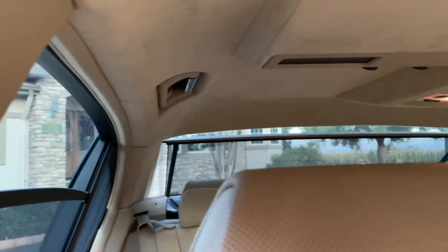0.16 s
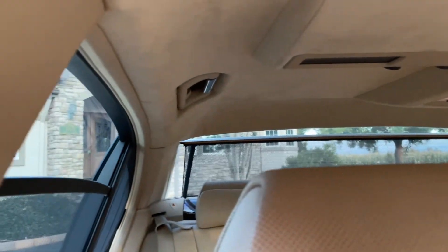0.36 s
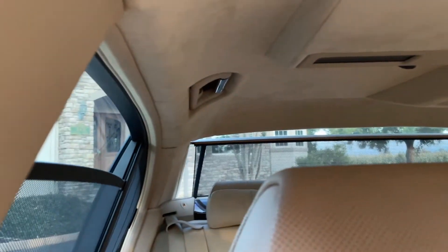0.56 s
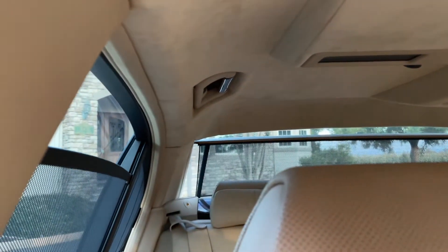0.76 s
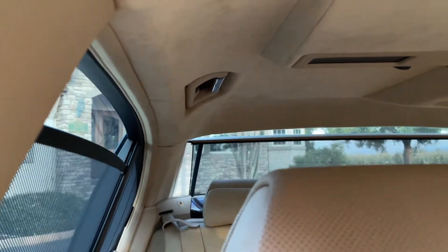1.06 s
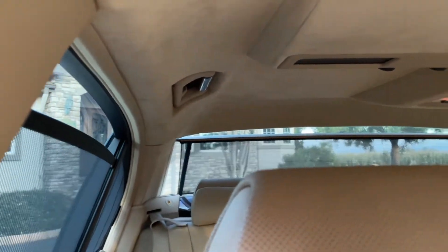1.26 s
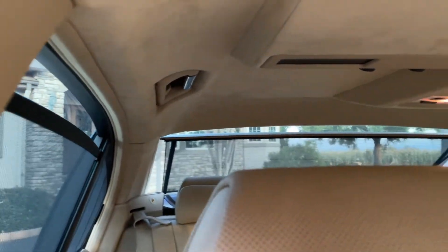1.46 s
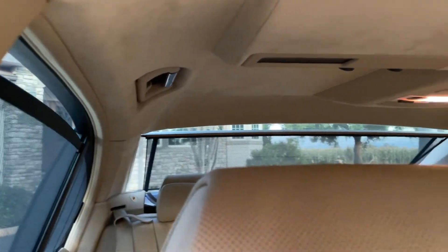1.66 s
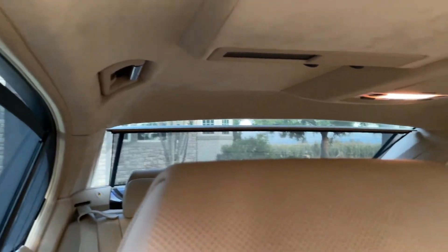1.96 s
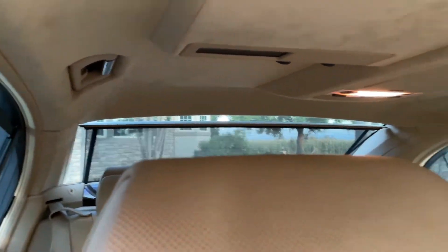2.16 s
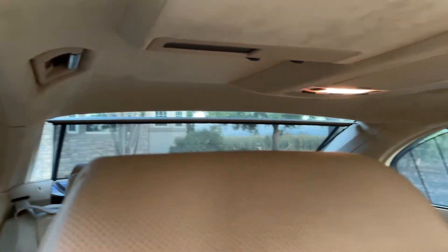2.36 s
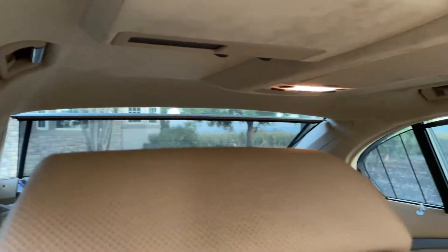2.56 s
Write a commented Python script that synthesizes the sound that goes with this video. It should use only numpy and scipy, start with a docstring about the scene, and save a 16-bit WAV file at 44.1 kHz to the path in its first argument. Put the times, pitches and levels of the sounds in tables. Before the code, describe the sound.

Two thin electric blind motors whir inside an idling car and stop with double knocks and a click

```python
"""Motor-driven sun blinds in a parked car

A twelve-cylinder engine idles as a harmonic series of its working cycle; a pump under the cabin hums on as
wavering sines. Two small motors draw mesh blinds along their rails: their gliding whines beat, over noise
from gears and mesh. Each blind knocks at its end stop, as decaying noise through door panel resonances;
a switch clicks off, among short coloured noise ticks. Two close microphone ports hear the treble with a lag.
"""
import sys
import numpy as np
from scipy import signal
from scipy.fft import rfft, irfft, next_fast_len
from scipy.io import wavfile
from scipy.ndimage import uniform_filter1d, map_coordinates

SR = 44100
rng = np.random.default_rng(int(sys.argv[2]) if len(sys.argv) > 2 else 0)


def boost_factor(decibels):
    """Convert a level in decibels to a linear amplitude factor."""
    exponent = np.asarray(decibels, float) / 20
    return 10 ** exponent


def wav_out(sig):
    """Save sig, one row per channel (or a flat mono array), as 16-bit PCM at SR to the path in sys.argv[1]."""
    wavfile.write(sys.argv[1], SR, np.round(np.clip(np.atleast_2d(sig).T, -1, 1) * 32767).astype(np.int16))


N = 119070  # samples

# Cabin noise spectrum, shape only: f/Hz, density/dB per Hz
CABIN_COLOUR = [(15, -20.5), (35, -3.5), (100, -6.5), (170, -8.5), (270, -10), (420, -16.5), (600, -27),
                (850, -31.5), (1250, -27), (1600, -35.5), (2150, -35.5), (3500, -45), (6000, -53),
                (10000, -62), (15800, -66.5), (16100, -90.5)]
# Left-right correlation of the cabin noise: f/Hz, correlation
CABIN_ALIKE = [(60, 1), (250, 0.76), (700, .1), (1300, 0.52), (4000, 0.12), (15000, 0.42)]
# Steady hums of pumps and fans: f/Hz, rms level/dB, scale of the frequency waver/Hz
HUMS = [(66.8, -41, 1), (105, -44, 1), (301, -56, 3), (1236, -67, 6), (1269, -61.5, 5), (1825, -79, 6),
        (2100, -75, 6), (12000, -94, 12)]
# Rate of the engine's working cycle: t/s, f/Hz
CYCLE_RATE = [(0.0, 6.045), (0.45, 6.058), (0.9, 6.011), (1.35, 6.048), (1.8, 6.071), (2.25, 5.977),
              (2.7, 5.977)]
# Fraction of a cycle completed at t = 0
CYCLE_START = .0267
# Engine orders: multiple of the cycle rate, rms level before the idle drift/dB, left-right difference/dB
ENGINE_ORDERS = [(6, -53, 0), (8, -51, -2), (9, -44, -4), (10, -51, 0), (12, -21, 1), (13, -43, 1),
                 (14, -37, 0), (15, -32, 1), (16, -48, 0), (18, -43, 1), (20, -42, -2), (21, -43, -3),
                 (22, -44, -2), (23, -46, 7), (24, -30, 5), (25, -50, 5), (26, -40, 3), (27, -51, 0),
                 (28, -59, -1), (33, -52, 2), (34, -53, -2), (36, -64, 0), (45, -60, 2)]
# Lead of the uneven orders above each firing multiple: {firing multiple: lead/cycle}
UNEVEN_LEAD = {12: .08, 24: .19}
# Phase shift common to the uneven orders/rad
UNEVEN_SHIFT = .25
# Slow drift of the whole engine: t/s, level/dB
IDLE_DRIFT = [(0, 0), (1.8, .2), (2.7, -.8)]
# Plastic clicks: t/s, onset level/dB, t60/s, brightness/dB per octave
CLICKS = [(1.8435, -48, .04, -8), (1.8595, -44, .05, -7), (1.8906, -50, .03, -7), (2.0158, -48, .05, -4),
          (2.0764, -30, .025, -1), (2.078, -37, .055, -2), (2.09, -45, .04, -2), (2.1725, -52, .035, -2)]
# Click spectrum before the brightness tilt, shape only: f/Hz, density/dB per Hz
PLASTIC_COLOUR = [(500, -12.5), (1300, -2), (1650, -10), (2050, -0.5), (2700, -3.5), (3250, -2.5),
                  (4000, -6.5), (5200, -5.5), (6200, -13.5), (9000, 0.5), (13500, -11.5), (16000, -6),
                  (16500, -38.5)]
# Left-right correlation of the clicks
CLICKS_ALIKE = .95
# Blinds striking their stops: t/s, peak level/dB, t60 of the exciting noise/s, left-right difference/dB
KNOCKS = [(1.8386, -28.5, .06, -1), (1.8585, -32, .05, 5.5), (1.8909, -39, 0.035, 0.5),
          (2.017, -39, 0.043, 2.5), (2.0282, -39, 0.11, -1.5), (2.078, -28.5, .05, -2.5),
          (2.0885, -32, .04, -2.5), (2.1713, -40, .12, 0)]
# Door panel resonances: f/Hz, bandwidth/Hz, relative level/dB
PANEL_MODES = [(214, 49, -6), (330, 70, 4), (445, 110, 2.5), (650, 150, -8), (850, 290, -12),
               (1260, 440, -19)]
# Whines of the two blind motors: t/s, f/Hz, level/dB
MOTOR_A = [(0, 535, -53), (1.25, 537, -53), (1.36, 532, -53), (1.64, 548, -52), (1.84, 548, -50),
           (2.0, 548, -56), (2.06, 545, -80)]
MOTOR_B = [(0, 547, -54), (.3, 547, -54), (.42, 541, -54), (.55, 546, -54), (.93, 544, -54),
           (1.05, 550, -54), (1.2, 545, -54), (1.36, 541, -56), (1.64, 560, -53), (1.8, 560, -54),
           (1.86, 552, -80)]
# Scale of the random waver of each whine/Hz
MOTOR_WAVER_HZ = 1.8
# Gear rumble: t/s, level/dB
GEAR_LEVEL = [(0, -57), (1.0, -57), (1.8, -57), (2.0, -57), (2.12, -60), (2.24, -80), (2.7, -85)]
# Gear rumble spectrum, shape only: f/Hz, density/dB per Hz
GEAR_COLOUR = [(140, -30), (220, 0), (330, 1), (450, 0), (700, -7), (1100, -15), (2500, -22), (5000, -40)]
# Mesh sliding in its rails: t/s, level/dB
SLIDE_LEVEL = [(0, -58), (.6, -58.5), (1.3, -58.5), (1.5, -58), (1.8, -58.5), (1.9, -60.5), (1.975, -61.5),
               (1.995, -90), (2.7, -90)]
# Sliding spectrum, shape only: f/Hz, density/dB per Hz
SLIDE_COLOUR = [(300, -20), (700, -5.5), (1100, -3), (2000, -6), (4000, -7.5), (5600, -13), (6800, -9),
                (8500, -13), (11000, -17), (14500, -17), (15800, -18), (16100, -50)]
# Left-right correlation of gears and sliding: f/Hz, correlation
BLINDS_ALIKE = [(60, .97), (250, .7), (700, .3), (2000, .25), (5000, .4), (7500, .95), (12000, .99)]
# Phase by which the left port leads the right (negative: lags): f/Hz, phase/rad
PORT_LEAD = [(60, .36), (200, .3), (600, .6), (5000, .6), (6500, -.8), (7700, -2.8), (9700, -3.5),
             (11900, -5.9), (13000, -6.28)]


def unit(x):
    """Normalisation: scales a signal to an rms of 1."""
    return x / np.sqrt(np.mean(x ** 2) + 1e-20)


def along(points, hz):
    """Interpolation of (frequency, value) points on a logarithmic axis."""
    f, value = np.transpose(points)
    return np.interp(np.log(hz + 1), np.log(f + 1), value)


def curves(rows):
    """Linear interpolation in time: one value per sample for each column after t."""
    times, *columns = np.transpose(rows)
    return [np.interp(np.arange(N) / SR, times, column) for column in columns]


def wobble(rate):
    """Slow random modulation: a smooth curve through random knots, rate of them per second."""
    knots = rng.standard_normal(int(N * rate / SR) + 4)
    return map_coordinates(knots, [np.arange(N) * rate / SR])


def filtered(x, response):
    """Linear filtering: the spectrum is multiplied by a complex frequency response."""
    length = next_fast_len(x.shape[-1] + 8192)
    spectrum = rfft(x, length) * response(np.fft.rfftfreq(length, 1 / SR))
    return irfft(spectrum, length)[..., :x.shape[-1]]


def pair(noise, alike):
    """Partial coherence: mid and side shares of two unrelated noises set the left-right correlation."""
    def shares(hz):
        angle = np.arccos(np.clip(along(alike, hz), 0, 1)) / 2
        return np.array([np.cos(angle), np.sin(angle)])

    mid, side = filtered(noise, shares)
    return np.array([mid + side, mid - side])


def rush(colour, alike, patchy_db):
    """Coloured stereo noise of rms 1, with patches of random gain in time and frequency."""
    spectrum = signal.stft(rng.standard_normal((2, N)), nperseg=512)[2]
    field = rng.standard_normal(spectrum.shape[1:])
    field = uniform_filter1d(field, size=5, axis=0)  # smooth over frequency
    field = uniform_filter1d(field, size=8, axis=1)  # smooth over time
    patchy = spectrum * boost_factor(patchy_db * unit(field))
    noise = signal.istft(patchy, nperseg=512)[1][:, :N]
    coloured = filtered(noise, lambda hz: boost_factor(along(colour, hz)))
    return unit(pair(coloured, alike))


def sides(pan_db):
    """Level-difference panning: gains of left and right, pan_db apart."""
    return boost_factor([[pan_db / 2], [-pan_db / 2]])


def tone(hz, db):
    """Phase accumulation: a sine of given rms follows a frequency curve from a random phase."""
    turns = np.cumsum(hz) / SR + rng.random()
    return np.sqrt(2) * boost_factor(db) * np.sin(2 * np.pi * turns)


def cabin():
    """Broadband background: random noise weighted to the low frequencies."""
    level = boost_factor(-41 + 1.3 * wobble(6))
    return level * rush(CABIN_COLOUR, CABIN_ALIKE, patchy_db=1.12)


def hums():
    """Tonal machine noise: pumps and fans give steady sines that waver in frequency and level."""
    out = np.zeros((2, N))
    for hz, db, waver_hz in HUMS:
        hum = tone(hz + waver_hz * wobble(8.6), db + 1.3 * wobble(25))
        out += hum * sides(rng.normal(0, 1))
    return out


def engine():
    """Engine orders: even firing gives multiples of twelve, uneven cylinders the orders between."""
    turns = 2 * np.pi * (CYCLE_START + np.cumsum(curves(CYCLE_RATE)[0]) / SR)
    out = np.zeros((2, N))
    for order, db, pan_db in ENGINE_ORDERS:
        if order % 12 == 0:
            shift = np.pi * (order > 12)  # opposed higher multiples sharpen the troughs
        else:
            firing = int(np.clip(12 * (order // 12), 12, 24))
            shift = 2 * np.pi * UNEVEN_LEAD[firing] * (order - firing) + UNEVEN_SHIFT
        level = np.sqrt(2) * boost_factor(db + 0.35 * wobble(4.1))
        out += level * np.cos(order * turns + shift + 0.04 * wobble(11)) * sides(pan_db)
    return boost_factor(curves(IDLE_DRIFT)[0]) * out


def clicks():
    """Impulsive sound: plastic ticks rise at once and decay exponentially in the cabin."""
    out, t = np.zeros((2, N + SR)), np.arange(SR // 5) / SR
    for start, db, t60, tilt_db in CLICKS:
        def colour(hz):
            octaves = np.log2(np.maximum(hz, 500) / 2000)
            return boost_factor(along(PLASTIC_COLOUR, hz) + tilt_db * octaves)

        noise = pair(rng.standard_normal((2, len(t))), [(1000, CLICKS_ALIKE)])
        noise = unit(filtered(noise, colour))
        rise = 1 - np.exp(-t / 0.0004)
        first = round(start * SR)
        out[:, first:first + len(t)] += boost_factor(db - 60 * t / t60) * rise * noise
    return out[:, :N]


def panel(f):
    """Modal summation: damped resonances of the door panel add with alternating sign."""
    total = 0
    for k, (centre, width, db) in enumerate(PANEL_MODES):
        mode = 1j * f * width / (centre * centre - f * f + 1j * f * width)
        total = total + (-1) ** k * boost_factor(db) * mode
    return total


def knocks():
    """Forced resonance: short dying noise at each stop shakes the door panel's modes."""
    out, t = np.zeros((2, N + SR)), np.arange(SR // 5) / SR
    for start, db, t60, pan_db in KNOCKS:
        blow = rng.standard_normal((2, len(t))) * boost_factor(-60 * t / t60)
        ring = filtered(pair(blow, [(300, 0.8)]), panel)
        ring = ring / np.abs(ring.mean(axis=0)).max()  # the mean of both sides peaks at 1
        first = round(start * SR)
        out[:, first:first + len(t)] += boost_factor(db) * ring * sides(pan_db)
    return out[:, :N]


def motors():
    """Beating: two whines close in frequency interfere as the motors' speeds wander."""
    whine = np.zeros(N)
    for hz, db in map(curves, (MOTOR_A, MOTOR_B)):
        whine += tone(hz + MOTOR_WAVER_HZ * wobble(6), db + 2.5 * wobble(5))
    return whine * sides(6)


def gears():
    """Contact noise of the motors' gears: a low rumble of random noise."""
    level = boost_factor(curves(GEAR_LEVEL)[0] + wobble(8))
    return level * rush(GEAR_COLOUR, BLINDS_ALIKE, patchy_db=1.5)


def sliding():
    """Friction noise: the mesh hisses in its rails."""
    level = boost_factor(curves(SLIDE_LEVEL)[0] + 0.6 * wobble(8))
    return level * rush(SLIDE_COLOUR, BLINDS_ALIKE, patchy_db=1.75)


def scene():
    """Superposition: the engine's sound adds to all the rest, which leans slightly left."""
    blinds = motors() + gears() + sliding()
    rest = cabin() + hums() + clicks() + knocks() + blinds
    return engine() + sides(0.6) * rest


def top_cut(x):
    """Nothing passes above the cut-off."""
    return signal.sosfilt(signal.butter(12, 16470, fs=SR, output="sos"), x)


def record(dry):
    """Interaural-like phase difference: two close ports differ in phase by frequency."""
    def port_phase(hz):
        return np.exp(0.5j * along(PORT_LEAD, hz) * np.array([[1], [-1]]))

    margin = 4096  # samples mirrored at each end, so that the filter meets no edge
    longer = np.pad(dry, ((0, 0), (margin, margin)), mode="reflect")
    ports = filtered(longer, port_phase)[:, margin:-margin]
    return top_cut(ports)


dry = scene()
out = record(dry)
wav_out(out)
```